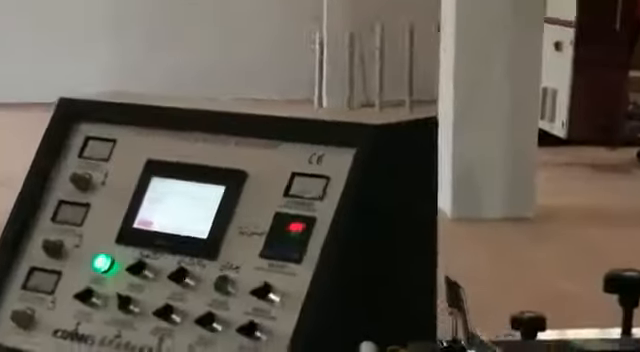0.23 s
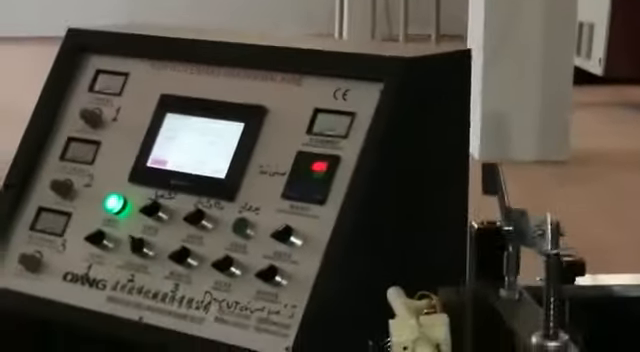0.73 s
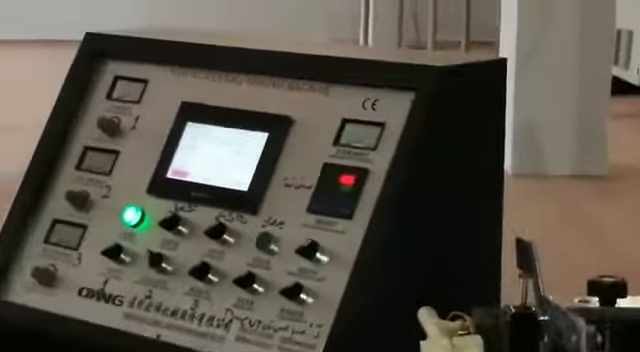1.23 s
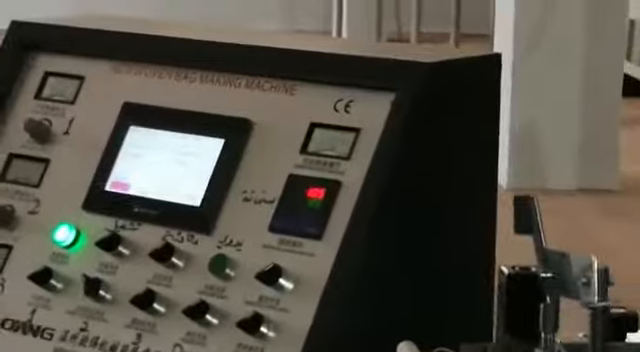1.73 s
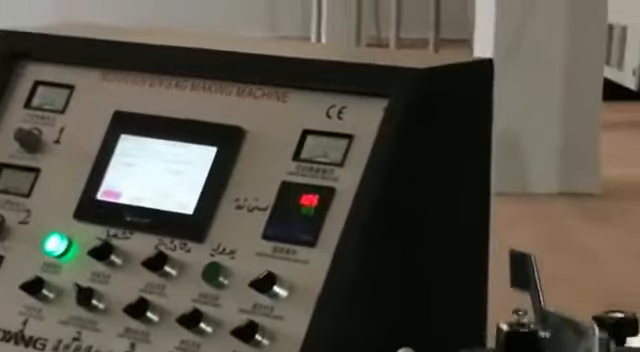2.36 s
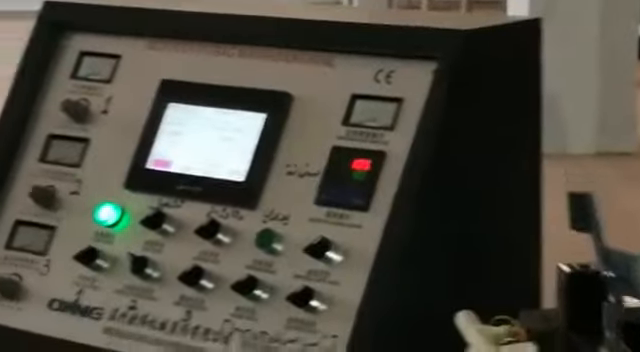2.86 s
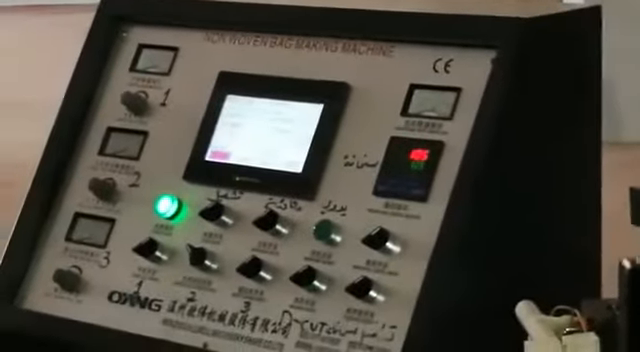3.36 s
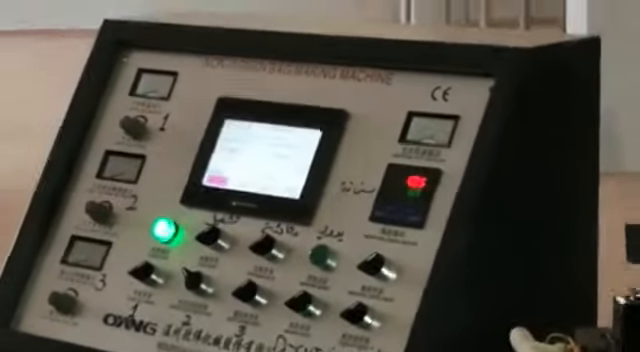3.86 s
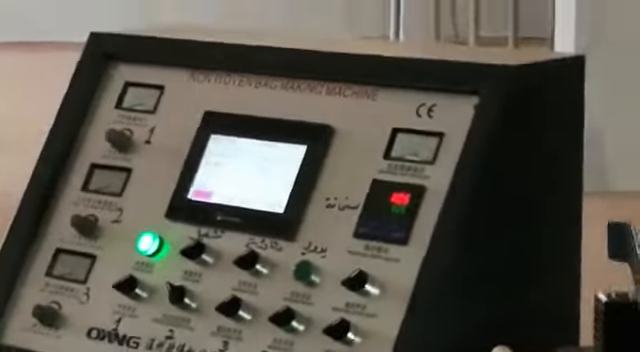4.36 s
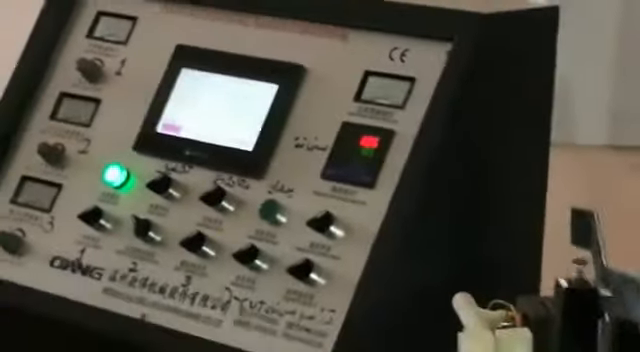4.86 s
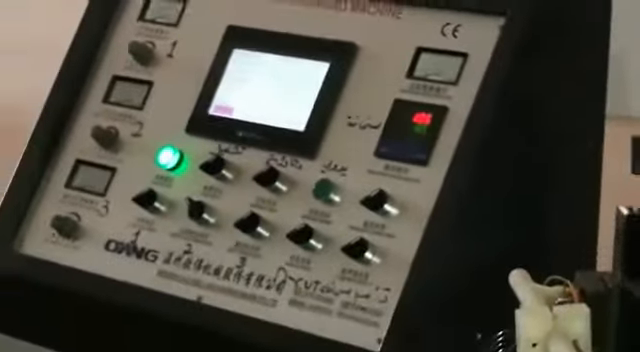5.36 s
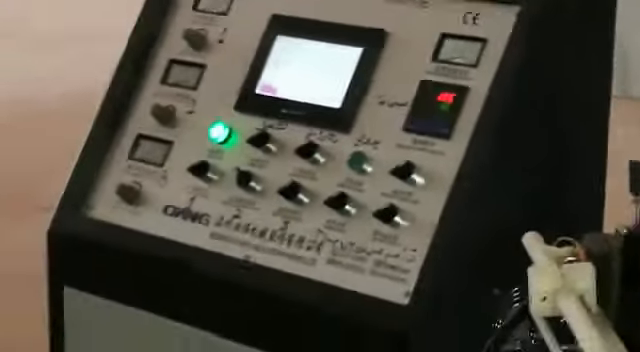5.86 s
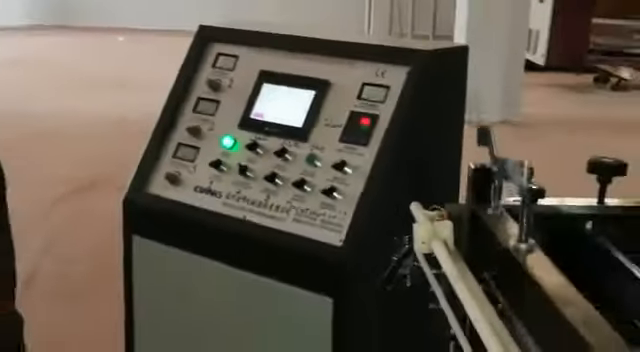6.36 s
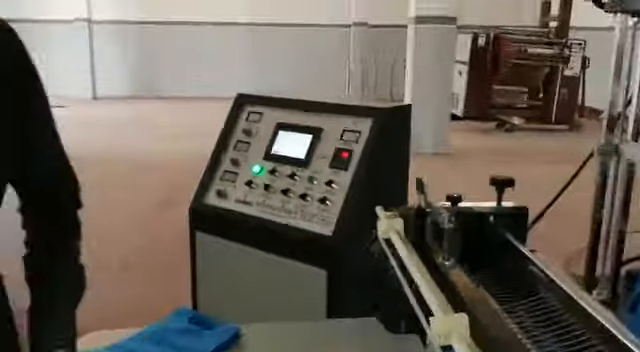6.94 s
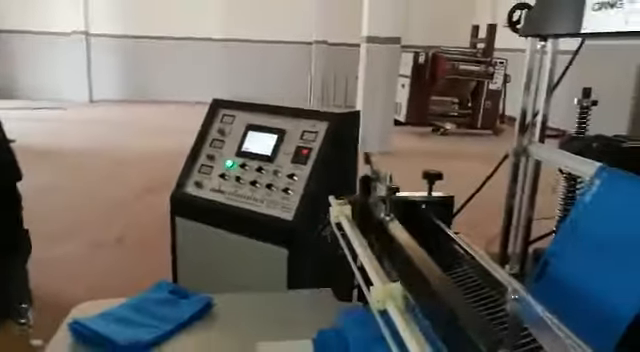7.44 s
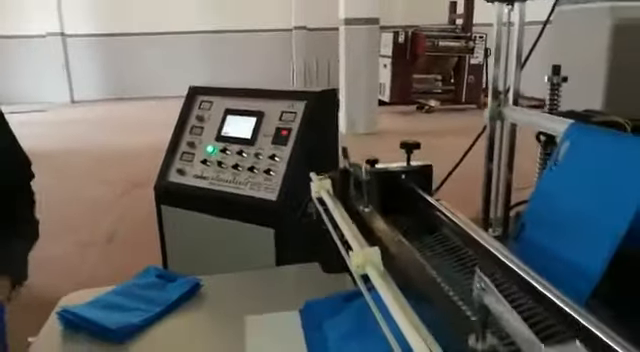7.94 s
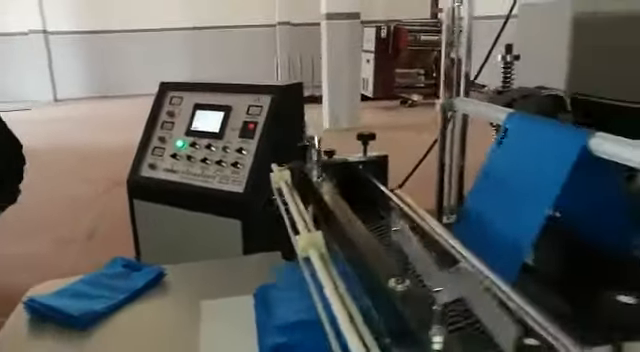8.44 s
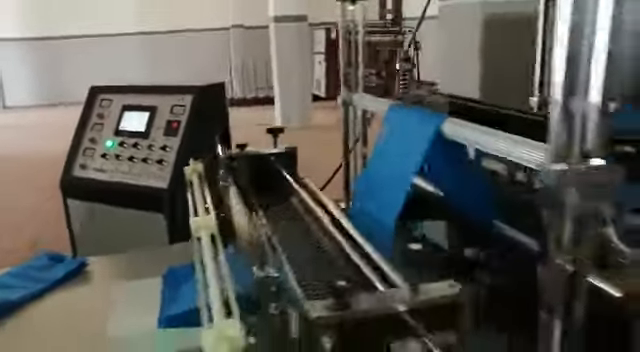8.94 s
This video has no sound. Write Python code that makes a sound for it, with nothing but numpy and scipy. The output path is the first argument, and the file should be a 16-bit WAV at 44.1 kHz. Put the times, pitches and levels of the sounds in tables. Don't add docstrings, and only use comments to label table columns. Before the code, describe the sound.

Close by in a large factory hall, a shrill buzzing weld stroke repeats steadily, preceded by small valve ticks and air puffs.

```python
import sys
import numpy as np
from scipy import signal
from scipy.fft import rfft, irfft, next_fast_len
from scipy.io import wavfile
from scipy.ndimage import uniform_filter1d

SR = 44100
rng = np.random.default_rng(int(sys.argv[2]) if len(sys.argv) > 2 else 0)


def elevation(decibels):
    levels = np.asarray(decibels, float)
    return 10 ** (levels / 20)


def persist_wave(psi):
    counts = np.round(np.clip(psi, -1, 1) * 32767).astype(np.int16)
    wavfile.write(sys.argv[1], SR, np.atleast_2d(counts).T)


N = 405279
T = np.arange(N) / SR
FINE_SR = 48000
M = N * 160 // 147 + 1
SIDE_BEAT_HZ, SIDE_FIRST_S = 75, 0.01588

# (start [s], low horn left [dB], low horn right [dB],
# high horn left [dB], high horn right [dB])
WELDS = [(0.196, -13.5, -12.5, -41, -24), (1.137, -13, -11, -38, -20.5), (2.085, -14, -13, -42, -29),
         (3.025, -12, -13, -53, -20.5), (3.976, -16, -14.5, -50, -22), (4.923, -14.5, -13.5, -41, -22.5),
         (5.868, -11, -16.5, -53, -28.5), (6.812, -12.5, -16.5, -55, -24.5),
         (7.76, -12.5, -13.5, -40, -24.5), (8.706, -13.5, -17, -48, -19)]


def walk(rate, size=N, sr=SR):
    hold = int(sr / rate)
    steps = np.repeat(rng.standard_normal(size // hold + 1), hold)
    return 1.63 * uniform_filter1d(uniform_filter1d(steps, hold), hold)[:size]


def on_log(table, hz):
    f, v = np.transpose(table)
    return np.interp(np.log(hz + 1), np.log(f), v)


def noise(colour, flicker_db, rate):
    # (frequency [Hz], correlation [-1..1])
    likeness = [(60, 0.95), (130, 1), (290, 0.8), (640, -0.36), (1400, 0.11), (15000, -0.13)]
    size = next_fast_len(N)
    hz = np.arange(size // 2 + 1) * SR / size
    like = np.clip(on_log(likeness, hz), -.99, .99)
    white = rfft(rng.standard_normal((2, size)))
    mid, side = white * elevation(on_log(colour, hz)) * np.sqrt([1 + like, 1 - like])
    pair = np.array([mid + side, mid - side])
    out = 0
    for centre in 40 * 2. ** np.arange(9):
        band = np.cos(np.pi / 2 * np.clip(np.log2((hz + 1) / centre), -1, 1))
        out = out + irfft(pair * band ** 2, size)[:, :N] * elevation(flicker_db * walk(rate))
    return out / np.sqrt(np.mean(out ** 2))


def place(out, s, sound, pan_db):
    i = int(s * SR)
    sides = elevation(np.array([[pan_db], [-pan_db]]) / 2)
    out[:, i:i + len(sound)] += (sound * sides)[:, :N - i]
    return out


def since_weld(t):
    starts = np.array(WELDS)[:, 0]
    starts = np.append(2 * starts[0] - starts[1], starts)
    k = np.maximum(np.searchsorted(starts, t) - 1, 0)
    return np.maximum(k - 1, 0), t - starts[k]


def horns():
    horn_hz = (14939, 20234, 19670, 19803)
    # (side mode left [dB], side mode right [dB], third horn over high left [dB], right [dB])
    mix = [(-12, -12, -2, -7), (-9, -3.5, -2, 3), (-13, -19, 4.5, -7), (-17, -36, -12, -9),
           (-12, -3.5, -13, -3.5), (-11.5, -13, -9, 4.5), (-14, -5.5, -0.5, -17), (-13, -24, 8.5, 2.5),
           (-38, -1, -9, -1.5), (-1, -14, 3, 3)]
    direct_shares = 0.93, 0.867, 0.5, 0.58
    side_t60_s = 0.37
    t = np.arange(M) / FINE_SR
    out = np.zeros((2, M), complex)
    weld, since = since_weld(t)
    for ear in range(2):
        low_db, high_db = horn_levels(t, ear)
        fourth_db = np.where(t > 7.5, high_db - 1.5, -99)
        side_db, third_db = np.array(mix)[weld][:, ear::2].T
        levels_db = low_db, high_db, high_db + third_db - 8, fourth_db
        wet = np.clip((-8.5 - low_db) / 10, .02, 1)
        for hz, level_db, direct in zip(horn_hz, levels_db, direct_shares):
            echo = walk(70, size=M, sr=FINE_SR) + 1j * walk(70, size=M, sr=FINE_SR)
            echo_share = np.sqrt((1 - direct ** 2 * (1 - wet)) / 2)
            field = direct * np.sqrt(1 - wet) + echo_share * echo
            field = field / np.maximum(np.abs(field) / 1.32, 1)
            rasp = uniform_filter1d(rng.standard_normal((2, M)), size=15, axis=1)
            field = field + elevation(-13.5) * (1 - wet) * (rasp[0] + 1j * rasp[1])
            out[ear] += elevation(level_db) * field * np.exp(2j * np.pi * hz * t)
        onset = 1 - np.exp(-np.maximum(since - .009, 0) / 0.015)
        fade = elevation(side_db) * 1000 ** (-since / side_t60_s) * onset
        side_turns = horn_hz[0] * t + SIDE_BEAT_HZ * (since - SIDE_FIRST_S)
        out[ear] += fade * np.exp(2j * np.pi * side_turns)
        chatter = np.minimum(elevation(1.72 * low_db - 25.5), elevation(-41)) * walk(90, size=M, sr=FINE_SR)
        out[ear] += chatter * np.exp(2j * np.pi * 7469 * t)
    return out


def horn_levels(t, ear):
    hold_s = (0.041, 0.19)
    # (start [s], length [s], low horn [dB], high horn [dB], depth of the beat [dB])
    swells_left = [(.229, 0.051, 4, -3, 14), (1.203, 0.028, 2, 0.5, 17), (2.122, 0.057, 2.5, -9.5, 18.5),
                   (3.042, 0.094, -2, -20, 14), (3.987, 0.018, -5.5, -16.5, 14),
                   (4.085, 0.0039, -16, -31, 15), (4.938, .016, -6, -26, 1), (4.99, .021, -9, -21, 15),
                   (5.879, 0.098, 5, -9, 8), (6.836, 0.067, 2.5, -7.5, 19), (7.785, 0.066, -13, -33, 1),
                   (8.728, 0.064, -8, -20.5, 9), (8.782, 0.028, 6.5, -19, 5.5)]
    # (start [s], length [s], low horn [dB], high horn [dB], depth of the beat [dB])
    swells_right = [(.21, 0.0023, -5, -13, 7), (0.309, 0.0065, -4.5, -8.5, 1), (1.151, 0.079, 0, -3.5, 8.5),
                    (1.225, 0.095, 1.5, -5.5, 3), (1.379, 0.008, -3.5, -13, -1),
                    (2.126, 0.033, -13, -10.5, 3), (2.184, 0.019, -2.5, -10.5, 2.5),
                    (2.253, 0.0013, 1, -13, -2.5), (3.099, 0.0098, -18.5, -9, -3),
                    (3.23, 0.0051, -10, -24, -2), (3.997, 0.018, 4.5, -3.5, 11.5),
                    (4.047, 0.015, -6, -13, -0.5), (4.113, 0.0042, -11.5, -16, -5.5),
                    (4.993, 0.021, -2.5, -10, 5.5), (5.893, 0.002, -9, 0.5, -4),
                    (6.901, 0.0044, -11, -30, -3), (6.918, .013, -6.5, -14.5, -0.5),
                    (7.002, 0.0079, -7, -14, 1), (7.785, 0.053, 6, -1, 8.5), (7.932, 0.0023, -11, -18.5, 0),
                    (8.732, 0.0024, -3, -17, -2), (8.772, .021, 2, 0.5, 11), (8.81, 0.0026, -4, -7.5, 2),
                    (8.871, 0.0056, -3, -13, 3)]
    attack_s, attack_db = 0.0114, 88
    low_fade_db_per_s, high_fade_db_per_s = (48.5, 56)[ear], 3
    edge_db_per_s, high_steeper = 2502, 1.56
    weld, since = since_weld(t)
    rise_db = -attack_db * np.clip(1 - since / attack_s, 0, 1) ** 1.05
    ring = np.maximum(since - hold_s[ear], 0)
    low_db = np.array(WELDS)[weld, 1 + ear] + rise_db - low_fade_db_per_s * ring
    high_db = np.array(WELDS)[weld, 3 + ear] - high_fade_db_per_s * ring
    trough = np.sin(np.pi * SIDE_BEAT_HZ * (since - SIDE_FIRST_S)) ** 2
    for s, length, low, high, depth_db in (swells_left, swells_right)[ear]:
        near = slice(*np.searchsorted(t, (s - .03, s + length + .03)))
        outside = np.maximum(np.abs(t[near] - s - length / 2) - length / 2, 0)
        drop = edge_db_per_s * outside + depth_db * trough[near]
        low_db[near] = np.maximum(low_db[near], low - drop)
        high_db[near] = np.maximum(high_db[near], high - high_steeper * drop)
    uneven_db = 3 * np.abs(walk(60, size=M, sr=FINE_SR))
    return low_db, high_db - uneven_db


def jolts():
    # (time [s], peak [dB], frequency [Hz])
    swings = [(0.228, -32, 94), (0.242, -20, 75), (0.257, -20, 95), (0.272, -34, 55), (1.202, -25, 65),
              (1.217, -18, 67), (2.132, -25.5, 107), (2.161, -18.5, 72), (2.253, -29, 160),
              (3.054, -25.5, 62.6), (3.089, -33, 55), (4.002, -25, 46), (4.95, -29.5, 88),
              (4.992, -23, 57.7), (5.915, -19.5, 83), (5.934, -25, 66.4), (5.95, -20.5, 72.6),
              (6.835, -23.5, 68), (6.849, -19, 114), (6.862, -25, 77), (6.878, -21.5, 46),
              (6.893, -23.5, 51), (7.788, -21, 75), (8.786, -19, 87)]
    out, u = np.zeros((2, N)), T[:4000]
    for (s, db, hz), pan in zip(swings, rng.standard_normal(len(swings))):
        swing = np.sin(2 * np.pi * hz * u) * np.exp(-(u * hz / 0.28) ** 2)
        out = place(out, s, elevation(db + 6) * swing, 3 * pan)
    return out


def valves():
    # (time [s], peak [dB], lowest modes' ring [dB])
    ticks = [(0.0892, -39, -3), (0.1394, -41, -10), (1.0355, -36.5, -8), (1.086, -39, -8), (1.985, -36, -7),
             (2.034, -37, -4), (2.928, -36, -7), (2.98, -40, -8), (3.8723, -37.5, -8), (3.9245, -39, -8),
             (4.8178, -36.5, 9), (4.873, -39.5, -2), (5.7632, -35, 8), (5.817, -39, -4), (6.7127, -41, 0),
             (6.764, -37.5, 1), (7.6583, -41, -6), (7.71, -42, -8), (8.606, -43.5, 3), (8.654, -40, -6)]
    # (frequency [Hz], level [dB], t60 [s])
    tick_modes = [(3944, 0.5, 0.074), (4530, 8.5, 0.0098), (6510, 2, 0.041), (7430, 13.5, 0.0051),
                  (2580, -2.5, 0.0086), (8950, -2.5, 0.021)]
    out, u = np.zeros((2, N)), T[:3000]
    for (s, db, ring_db), chance in zip(ticks, rng.standard_normal((len(ticks), 3000))):
        ring = 0
        for (f, g, t60), c in zip(tick_modes, chance):
            mode_db = g + 2.5 * c + ring_db * (f < 4200)
            ring = ring + elevation(mode_db) * np.sin(2 * np.pi * f * u) * 1000 ** (-u / t60)
        tick = signal.fftconvolve(ring, chance * np.exp(-u / 0.015))[:3000]
        rattle = np.diff(chance, prepend=0) * np.exp(-u / 0.0089)
        blow = elevation(7.5) * tick / np.abs(tick).max() + rattle
        out = place(out, s, elevation(db - 17) * blow, -39.5)
    return out


def cloth_snaps():
    # (time [s], peak [dB])
    snaps = [
        (8.3174, -39),
        (8.378, -36),
        (8.4082, -30),
        (8.4148, -26.5),
        (8.417, -34),
    ]
    out, u = np.zeros((2, N)), T[:60]
    click = np.sin(2 * np.pi * 4500 * u) * np.exp(-u / 0.00023)
    click = click + np.sin(2 * np.pi * 12000 * u) * np.exp(-u / 0.0001)
    for s, db in snaps:
        out = place(out, s, elevation(db) * np.diff(click), -24)
    return out


def valve_air():
    # (frequency [Hz], density [dB per Hz])
    air_colour = [(500, -25), (1180, -6.5), (2000, -4), (3400, -0.5), (4770, -1.5), (6900, 1), (10000, -1),
                  (14200, -7.5)]
    puff_s, puff_rise_s, puff_hold_s, puff_db_per_s = 0.727, 0.019, 0.12, 110
    since = since_weld(T)[1]
    late = since - puff_s
    exhaust = elevation(-41 - 41.5 * since)
    puff = elevation(-48 - puff_db_per_s * np.maximum(late - puff_hold_s, 0))
    puff = puff * np.clip(1 + late / puff_rise_s, 0, 1) ** 2
    flow = uniform_filter1d(elevation(-67.5) + exhaust + puff, size=900)
    first_puff = elevation(6.6 * (T < .2))
    return first_puff * flow * noise(air_colour, flicker_db=1.0, rate=30)


def frame_shudder():
    # (frequency [Hz], density [dB per Hz])
    shudder_colour = [(40, -101), (80, -1.5), (200, -3.5), (500, -14), (1300, -9), (2500, -15),
                      (5000, -33.5)]
    # (time after the weld starts [s], level [dB], width [s])
    knocks = [
        (.09, -44, 0.11),
        (.53, -54, 0.022),
        (.91, -45.5, .035),
    ]
    since = since_weld(T)[1]
    shake = elevation(-52) + sum(elevation(db) * np.exp(-((since - s) / width) ** 2) for s, db, width in knocks)
    return shake * noise(shudder_colour, flicker_db=2.0, rate=25)


def whine():
    # (middle [s], level [dB])
    pulls = [(.75, -53), (1.82, -58.5), (3.05, -62), (4.25, -59), (5.45, -56.5), (6.42, -57), (7.75, -62.5),
             (8.7, -64)]
    line_hz = (6665, 6944, 13534, 14266, 1152)
    line_db = (7, -17, 1, -3, -16)
    pull = sum(elevation(db) * np.exp(-(np.abs(T - s) / 0.165) ** 4) for s, db in pulls)
    lines = np.zeros((2, N))
    for ear in range(2):
        for f, g in zip(line_hz, line_db):
            lines[ear] += elevation(g + 2 * walk(8.5)) * np.sin(2 * np.pi * (f * T + rng.random()))
    return elevation(-6.0) * pull * lines


def low_tones():
    # (time [s], level [dB])
    hum = [(7.4, -70), (7.8, -54), (8.1, -53), (8.25, -58), (8.42, -49), (8.7, -63), (8.95, -47.5),
           (9.06, -57), (9.19, -50)]
    # (frequency [Hz], width [Hz], level [dB])
    hum_modes = [(133, 6.4, -15), (376, 14, 0), (404, 32, -5.5), (520, 17, -5), (546, 13, -1.5)]
    s, db = np.transpose(hum)
    modes = [elevation(g) * (walk(w) + 1j * walk(w)) * np.exp(2j * np.pi * f * T) for f, w, g in hum_modes]
    level = elevation(np.interp(T, s, db) - 5 + 1.5 * walk(12))
    ears = np.array([[1], [1.5 * np.exp(2.4j)]])
    return level * (np.sum(modes, axis=0) * ears).imag


def hall_hum():
    # (frequency [Hz], density [dB per Hz])
    hall_colour = [(15, -33), (25, 2), (400, -8.5), (731, -5.5), (1250, -6), (5400, -17), (7500, -26),
                   (13000, -64)]
    return elevation(-51 + walk(1.845)) * noise(hall_colour, flicker_db=-0.74, rate=16.0)


def scene():
    machine = valves() + cloth_snaps() + valve_air() + frame_shudder() + whine()
    return machine + low_tones() + hall_hum()


def low_pass(x):
    return signal.sosfilt(signal.butter(12, 16950, fs=SR, output="sos"), x)


def record(dry):
    # (frequency [Hz], gain [dB])
    phone = [(3000, -0.5), (6000, -1), (10000, -5.5), (12000, -7.5), (13300, -11.5), (14940, -1),
             (15700, -15), (16900, -36)]
    bend, ceiling = 0.84, 0.3
    x = signal.resample_poly(dry, 160, 147, axis=1)[:, :M]
    tone = horns()[:, :x.shape[1]]
    block_slow = signal.butter(1, 250, "high", fs=FINE_SR, output="sos")
    difference = signal.sosfilt(block_slow, np.abs(tone) ** 2 / 2)
    clipped = np.clip(x + tone.imag + bend * difference, -ceiling, ceiling)
    y = signal.resample_poly(clipped, 147, 160, axis=1)[:, :N]
    size = next_fast_len(N)
    hz = np.arange(size // 2 + 1) * SR / size
    response = elevation(on_log(phone, hz)) * (hz < 16900)
    y = irfft(rfft(y, size) * response, size)[:, :N] + jolts()
    y = signal.sosfilt(signal.butter(1, 30, "high", fs=SR, output="sos"), y)
    return low_pass(y)


dry = scene()
out = record(dry)
persist_wave(out)
```